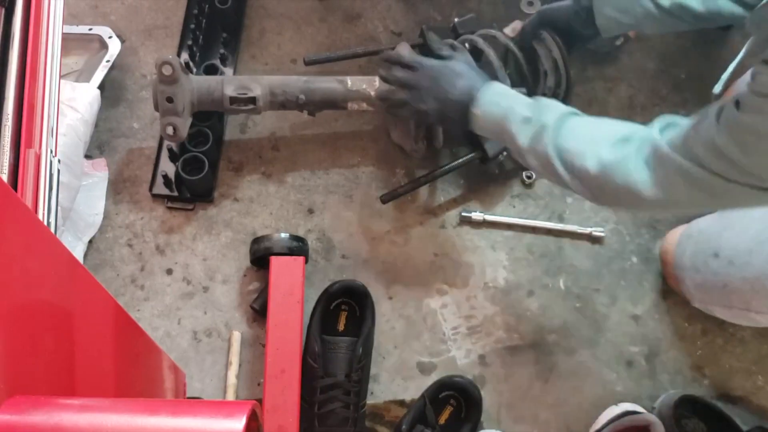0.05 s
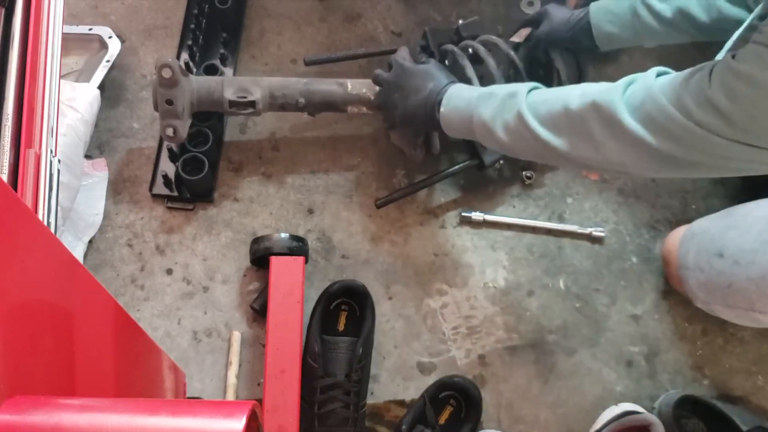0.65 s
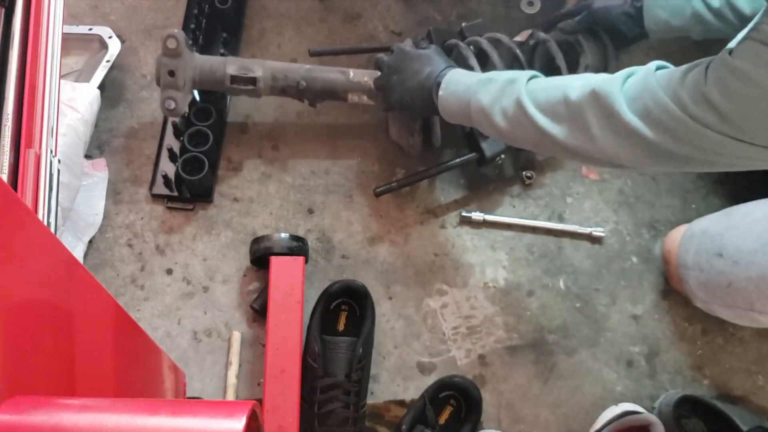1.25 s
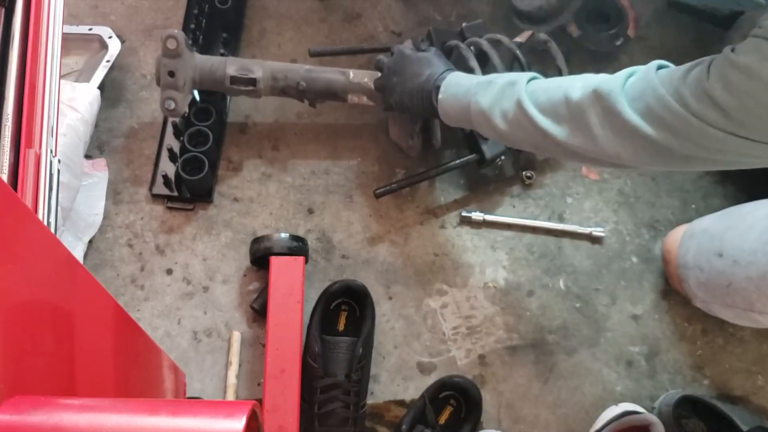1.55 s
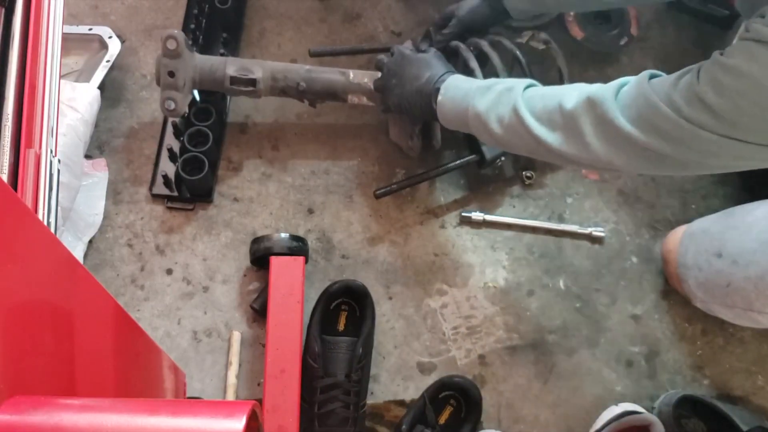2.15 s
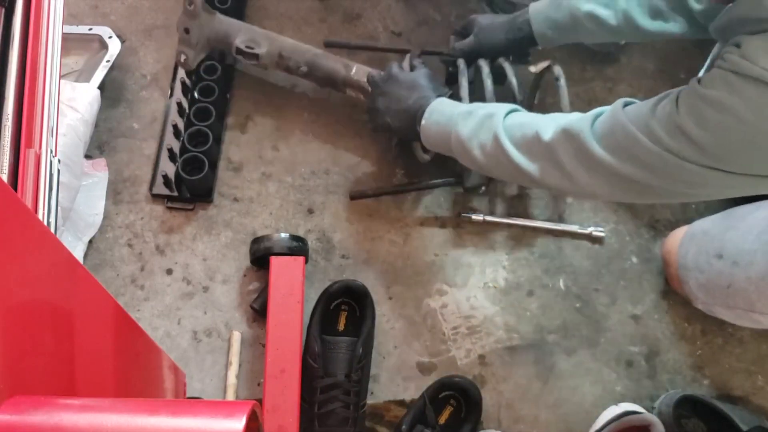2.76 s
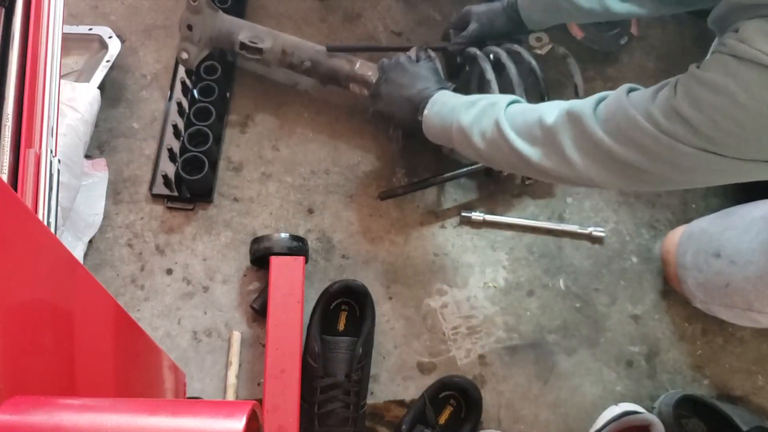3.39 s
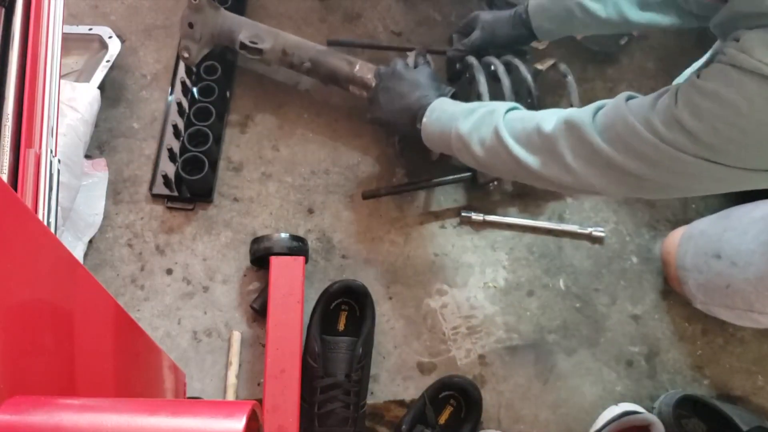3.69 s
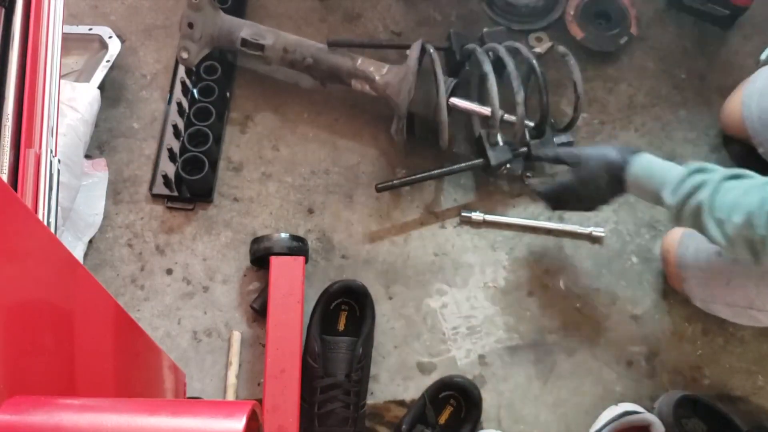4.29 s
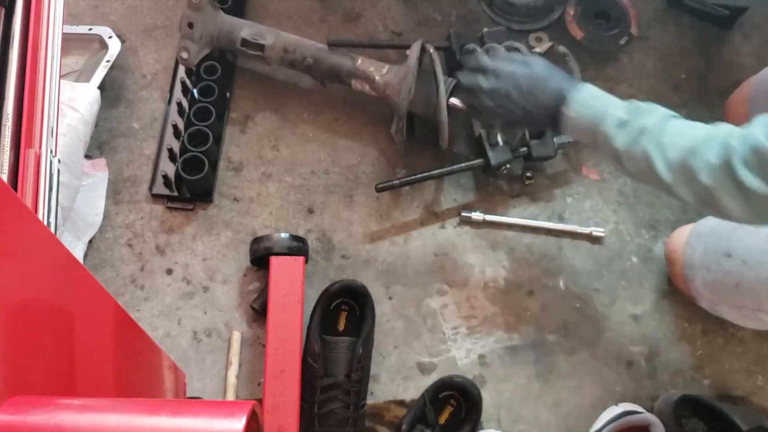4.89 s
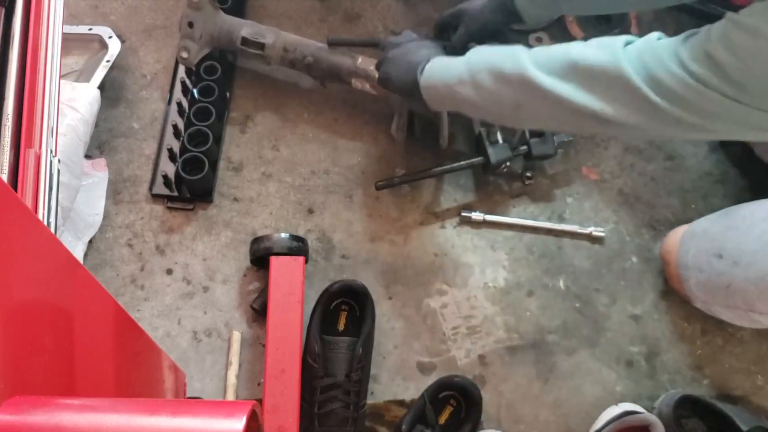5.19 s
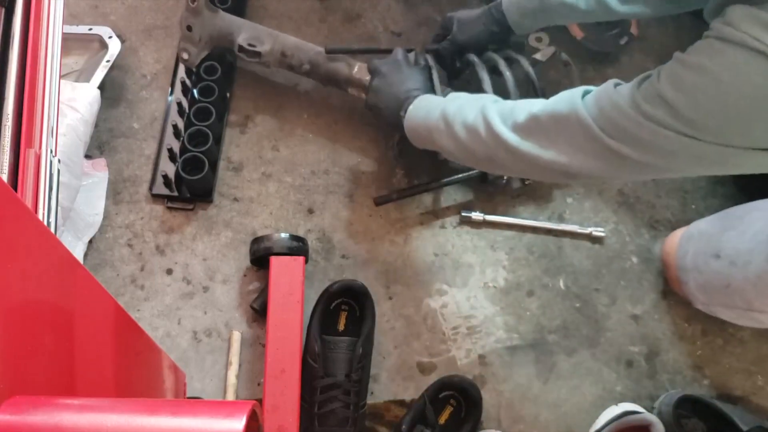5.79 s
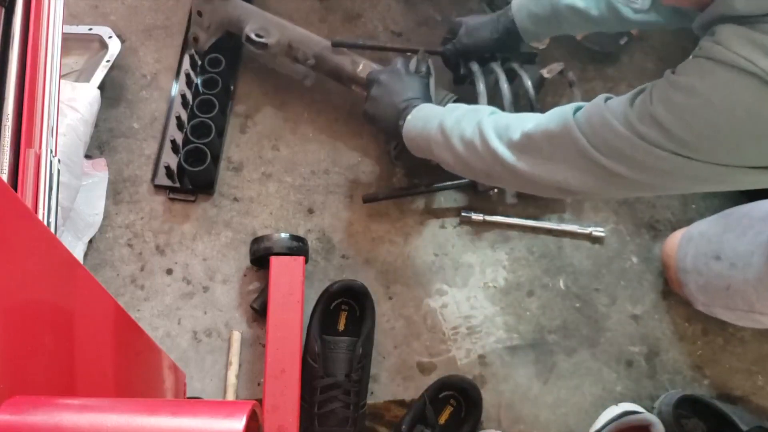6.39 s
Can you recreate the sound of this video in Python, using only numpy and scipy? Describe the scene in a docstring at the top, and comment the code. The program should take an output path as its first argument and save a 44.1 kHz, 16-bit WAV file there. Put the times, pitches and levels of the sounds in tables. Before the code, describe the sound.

A car strut is worked loose from its coil spring in a garage. A few light steel clinks build to a loud, quick clatter, then the spring rattles and rings faintly. More clanks and dull knocks follow and thin out. After a short lull come further clinks and knocks, a brief scrape and rustling sleeves. The sounds are close, with a short room echo over a low machine hum.

```python
"""Freeing a strut from its spring

A car strut is worked loose from its coil spring on a concrete garage floor. Impacts excite the modes
of the steel top mount, which clinks and clatters, and the heavy strut knocks on its supports. The coil
shudders against its seat, small hardware pings, and friction makes a short scrape and the rustle of
sleeves. The room reverberates, over a low machine hum and a distant rumble."""
import sys
import numpy as np
from scipy import signal
from scipy.fft import rfft, irfft
from scipy.io import wavfile
from scipy.ndimage import uniform_filter1d

SR = 44100
rng = np.random.default_rng(int(sys.argv[2]) if len(sys.argv) > 2 else 0)


def dump(signal):
    """Clip the signal to [-1, 1] and save it as 16-bit WAV at the path in sys.argv[1]."""
    limited = np.clip(np.atleast_2d(signal).T, -1, 1)
    pcm = np.round(limited * 32767).astype(np.int16)
    wavfile.write(sys.argv[1], SR, pcm)


N = 293265
TIME, RING_TIME = np.arange(N) / SR, np.arange(SR) / SR

# Levels are relative within each table; t60 is the time to decay by 60 dB.
# Steel on steel: start_s, level_db, thud_db, hardness_db, tick_db, mount_db, clatter_t60_s, favoured_hz
STEEL_STRIKES = [(0.413, 3, 0.5, 12.5, -12.5, -9.5, 0.13, 3050), (0.768, -1, 0, -2, -41, -30, 0.23, 2325),
                 (1.131, 8, 1, 3.5, -25, -6, 0.26, 1540), (1.183, 3, 6.5, 1, -37, -25, 0.055, 1480),
                 (1.688, 25, -9, -5, -22, -11.5, 0.13, 2880),
                 (1.76, 17, -7.5, -4.5, -21, -8.5, 0.057, 3690),
                 (1.793, 18.5, -12, -12.5, -26, -15.5, 0.049, 3690),
                 (1.875, 16.5, -5.5, 6.5, -3.5, -12, 0.079, 5400),
                 (1.927, 30.5, -17.5, -9.5, -20, -13.5, 0.04, 1200),
                 (1.935, 21.5, -17.5, 1.5, -8.5, -18, 0.031, 1297),
                 (2.044, 31, -25, -3.5, -20.5, -15.5, 0.063, 3130),
                 (2.082, 16.5, -25, -13, -23, -12.5, 0.075, 1050),
                 (2.769, 26.5, -8, -7, -16, -18.5, 0.084, 1049),
                 (2.971, 11.5, -8, -7.5, -31, -15, 0.043, 2454),
                 (3.108, 13.5, -8, 0.5, -22, -11, 0.16, 2454), (3.42, 1, -1, -6.5, -14, -22.5, 0.043, 1880),
                 (5.443, 1, -9.5, -6, -16, -20, 0.2, 1760), (5.713, 12, -8.5, -0.5, -29, -11, 0.19, 4280),
                 (6.222, -5.5, -26, 28.5, 0, -10.5, 0.02, 4120)]
# The strut shifting against its supports: start_s, level_db, thud_db, favoured_hz
STRUT_KNOCKS = [(0.844, -1.5, 15, 560), (0.911, 2, -13, 1945), (2.832, 17.5, -13, 1945),
                (3.268, 9, -3.5, 2454), (3.391, 4, -1.5, 1945), (3.801, -4.5, 6, 945),
                (3.858, -10.5, 17, 560), (4.036, -2, 3, 1200), (4.069, -2.5, -5, 1945), (5.77, 16, -6, 560),
                (5.897, 10, 3, 843), (6.034, -13, 9, 1540), (6.057, 8, -8, 560), (6.201, 3.5, 3, 560)]
# Treble roll-off of a knock: frequency_hz, gain_db
KNOCK_ROLLOFF = [(1900, -0.5), (2700, -10.5), (5500, -14.5), (12000, -34.5)]
# Modes of the top mount: pitch_hz, level_db, t60_s
MOUNT_MODES = [(288, -17, 0.064), (421, -9, 0.12), (555, -5.5, 0.17), (732, -5.5, 0.087),
               (845, -6.5, 0.093), (963, -5, 0.066), (1041.5, -4, .14), (1180, -7, 0.065),
               (1294, -10.5, 0.12), (1552, 1, 0.077), (1913, -9.5, 0.14), (2350, -6.5, 0.18),
               (2447, -4, 0.15), (2877, -2, 0.14), (3000, -4.5, 0.042), (3720, 0.5, 0.12),
               (4230, -8.5, 0.09), (4535, -11, .14), (5460, -2.5, 0.1), (6370, -3.5, .13), (6950, 1, 0.15),
               (6730, -2, 0.22)]
# The coil bouncing on its seat: start_s, level_db, hardness_db
COIL_BOUNCES = [(2.108, -19, -13.5), (2.197, -21, 2.5), (2.296, -24.5, -1.5), (2.366, -28, 2.5),
                (2.454, -24, -8.5), (2.513, -27.5, -4), (2.591, -26, -8), (2.654, -30, 2)]
# Short-lived modes of the coil: pitch_hz, level_db, t60_s
COIL_MODES = [(568.6, -5, 0.087), (621, -8, 0.071), (800.7, 1.5, 0.093), (845.5, 3.5, 0.079),
              (924, -2, 0.089), (1065, -9, 0.13), (1376, -31.5, 0.13), (1572, -13.5, 0.13),
              (1790, -13, .11), (2330, -20.5, 0.085), (2880, -26, 0.18)]
# Lightly damped modes of the coil: pitch_hz, level_db, t60_s
LINGERING_MODES = [(812, -42, 5), (847, -42, 5), (825, -47, 4.2), (940, -43, 2.2)]
# Spectrum of the coil's rattle: frequency_hz, gain_db
RATTLE_SPECTRUM = [(100, -19.5), (400, -6), (900, -2.5), (1900, -1.5), (3200, -11), (4500, -19),
                   (7000, -25.5), (15000, -50.5)]
# Pings of a nut or washer: start_s, level_db, finger_damping_db_per_s
NUT_PINGS = [(0.772, -30.5, 168), (2.275, -33.5, 16)]
# Its modes, of which the close pair beats: pitch_hz, level_db, t60_s
NUT_MODES = [(11550, -6, 0.9), (11548, -11, 0.99), (11720, -4, 0.29), (13250, -7, 0.25)]
# Spectrum of the scrape: frequency_hz, gain_db
SLIP_SPECTRUM = [(200, -30.5), (1000, -3.5), (1900, -4.5), (2600, 1), (3800, 5.5), (6500, -4), (7800, -29),
                 (11000, -27.5), (16000, -54)]
# Resonances of the scrape: pitch_hz, bandwidth_hz, level_db
SLIP_RESONANCES = [(2380, 30, -2), (3360, 24, -4), (3980, 50, -9), (4030, 28, -8), (6080, 33, -5),
                   (6380, 35, -4)]
# Strokes of sleeves and gloves: peak_s, level_db, swell_s, fade_s
CLOTH_STROKES = [(0.17, -42, 0.13, 0.12), (0.375, -39, 0.082, 0.05), (0.87, -44.5, 0.13, 0.14),
                 (1.39, -49, 0.13, 0.06), (2.75, -42, 0.19, 0.36), (3.359, -56.5, 0.57, 0.28),
                 (4.06, -44, 0.13, 0.08), (4.55, -56, 0.053, 0.28), (5.16, -42, 0.022, 0.24),
                 (5.452, -44, 0.038, 0.053), (5.52, -43, 0.018, 0.031), (5.93, -43.5, 0.042, 0.12),
                 (6.089, -42.5, 0.045, 0.081), (6.36, -29.5, 0.2, 0.14), (6.499, -32, 0.51, 0.059)]
# Spectrum of sliding cloth: frequency_hz, gain_db
CLOTH_SPECTRUM = [(100, -23), (300, -6), (600, 2), (1300, 6), (2500, 6.5), (4000, 10.5), (7000, 12.5),
                  (10000, -1.5), (13000, 1.5), (16000, -2.5)]
# Reverberation time of the garage: frequency_hz, t60_s
GARAGE_DECAY = [(150, 0.44), (400, 0.31), (1000, 0.31), (2800, 0.31), (7000, 0.29), (15000, 0.25)]
# Partials of the machine hum: pitch_hz, level_db
HUM_PARTIALS = [(70, -0.5), (104, -9.5), (140, -25)]
# Envelope of the hum: time_s, level_db
HUM_ENVELOPE = [(0, -50), (0.95, -49.5), (1.4, -55), (2.5, -62), (3.0, -51), (3.6, -56), (5.2, -45.5),
                (6.65, -45)]
# Spectrum of the distant rumble: frequency_hz, gain_db
RUMBLE_SPECTRUM = [(20, -24), (45, -1.5), (75, -2), (120, 2), (170, -3.5), (260, -15), (480, -11),
                   (750, -16), (1200, -21.5), (2200, -27.5), (5000, -57)]
# Envelope of the rumble: time_s, level_db
RUMBLE_ENVELOPE = [(0, -43), (1.0, -46.5), (1.8, -51), (3.5, -53), (4.6, -60.5), (5.7, -52.5), (6.65, -51)]
# Spectrum of still air: frequency_hz, gain_db
AIR_SPECTRUM = [(20, 27.5), (60, 23.5), (130, 20), (500, 18.5), (1200, 1), (2500, -4), (6000, 7),
                (10000, -5.5), (16000, -8.5)]
# Left-right likeness of diffuse sound: frequency_hz, correlation
COHERENCE = [(30, 0.89), (120, 1), (250, 0.67), (500, 0.89), (1000, 0), (3000, 0), (16000, 0)]
# Response of the microphone: frequency_hz, gain_db
MICROPHONE_RESPONSE = [(1000, -3), (7300, -10), (8100, -13.5), (9200, -12), (10500, -3.5), (14500, -3),
                       (16000, -15.5)]

TREMBLE_START_S, TREMBLE_END_S = 2.72, 3.8
CLANK_HZ, CLINK_HZ, TICK_HZ = 2400, 6120, 12100  # treble bands of an impact


def clinks(out_db=-3, pan_db=0.9):
    """Hard impact: the harder steel meets steel, the more treble the contact excites."""
    out = np.zeros((2, N))
    for start_s, db, thud_db, hard_db, tick_db, mount_db, t60_s, favoured_hz in STEEL_STRIKES:
        treble = [(CLANK_HZ, 0.77 * hard_db - 1), (CLINK_HZ, hard_db), (TICK_HZ, tick_db)]
        add(out, start_s, amp(db) * impact(thud_db, treble, mount_db, t60_s, favoured_hz))
    return out * amp([[out_db + pan_db], [out_db - pan_db]])


def knocks(out_db=-3, mount_db=-16, t60_s=0.085):
    """Dull impact: the heavy strut's longer contacts put little energy into the treble."""
    out = np.zeros((2, N))
    for start_s, db, thud_db, favoured_hz in STRUT_KNOCKS:
        knock = impact(thud_db, KNOCK_ROLLOFF, mount_db, t60_s, favoured_hz)
        add(out, start_s, amp(db + out_db) * knock)
    return out


def impact(thud_db, treble, mount_db, t60_s, favoured_hz):
    """Impulse excitation: a crack, a clatter and the mount's modes, some favoured by the strike point."""
    hz, mode_db, mode_t60_s = np.transpose(MOUNT_MODES)
    favoured_db = 9 * np.exp(-(np.log(hz / favoured_hz) / 0.12) ** 2)
    modes = np.transpose([hz, mode_db + favoured_db, mode_t60_s])
    sound = amp(mount_db - 28) * ring(modes, split=0.011)
    add(sound, 0, clatter(t60_s))
    add(sound, 0, amp(-6) * clatter(t60_s=0.0067))  # the crack
    rise_s = 0.00061 * amp(-0.6 * value_at(treble, CLINK_HZ))  # dull contacts build up more slowly
    sound *= 1 - np.exp(-RING_TIME / rise_s)
    bass = [(50, thud_db - 10), (150, thud_db), (520, thud_db / 2 + 1), (1000, 0)]
    return colour(sound, bass + treble)


def clatter(t60_s, size=8192):
    """Modal overlap: a crowd of short-lived modes merges into a noise burst, here of unit energy."""
    burst = diffuse(rng.standard_normal((2, size))) * amp(-60 * RING_TIME[:size] / t60_s)
    return burst / np.sqrt(np.sum(burst ** 2) / 2)


def coil(rise_s=0.0036, hand_damping_db_per_s=90):
    """Free vibration: taps ring and rattle the coil, and close modes beat until a hand damps them."""
    out = np.zeros((2, N))
    swell = 1 - np.exp(-RING_TIME / rise_s)
    for start_s, db, hard_db in coil_taps():
        tap = ring(COIL_MODES, split=0.014)
        rattle = colour(clatter(t60_s=0.2), RATTLE_SPECTRUM)
        add(tap, 0, amp(35 + hard_db) * rattle)
        add(out, start_s, amp(db) * tap * swell)
    add(out, COIL_BOUNCES[0][0], ring(LINGERING_MODES, count=1, size=N))
    return out * amp(-hand_damping_db_per_s * np.maximum(TIME - TREMBLE_END_S, 0))


def coil_taps(rebound_s=0.021, rebound_db=-7, gap_s=0.066, jitter_s=0.0095, fade_db_per_s=13):
    """Inelastic collision: each bounce rebounds once, more weakly; then a light tremble dies away."""
    rebounds = [(s + rebound_s, db + rebound_db, hard_db) for s, db, hard_db in COIL_BOUNCES]
    tremble = []
    for s in np.arange(TREMBLE_START_S, TREMBLE_END_S, gap_s):
        db = -32 - fade_db_per_s * (s - TREMBLE_START_S)
        tremble.append((rng.normal(s, jitter_s), db, -10))  # start_s, level_db, hardness_db
    return COIL_BOUNCES + rebounds + tremble


def pings():
    """Small bodies have high modes: a steel nut rings above 11 kHz, damped by the fingers."""
    out = np.zeros((2, N))
    for start_s, db, damping_db_per_s in NUT_PINGS:
        add(out, start_s, amp(db - damping_db_per_s * RING_TIME) * ring(NUT_MODES, count=1))
    return out


def slip(start_s=6.222, end_s=6.28, rise_s=0.018, release_db_per_s=1200, drive_db=-25.5, pan_db=2):
    """Stick-slip friction: the strut catches and lets go on its seat, driving narrow resonances."""
    release_db = release_db_per_s * np.clip(TIME - end_s, 0, 0.5)
    pressure = np.clip((TIME - start_s) / rise_s, 0, 1) * amp(drive_db - release_db)
    drive = crackle(SLIP_SPECTRUM, rate_per_s=2200) * pressure
    ringing = sum(amp(db + 7) * signal.lfilter(*signal.iirpeak(hz, hz / width_hz, SR), drive)
                  for hz, width_hz, db in SLIP_RESONANCES)
    return (drive + ringing) * amp([[pan_db], [-pan_db]])


def rustle(snap_db=-7, depth_db=17, out_db=-3, pan_db=1):
    """Friction noise: cloth and rubber hiss, with small fibre snaps, in strokes that swell and fade."""
    hiss = noise(CLOTH_SPECTRUM) + amp(snap_db) * crackle(CLOTH_SPECTRUM, rate_per_s=900)
    strokes_db = [db - depth_db * np.maximum((peak_s - TIME) / swell_s, (TIME - peak_s) / fade_s)
                  for peak_s, db, swell_s, fade_s in CLOTH_STROKES]
    return hiss * amp(np.max(strokes_db, axis=0)) * amp([[out_db + pan_db], [out_db - pan_db]])


def garage(sound, delay_s=0.0011, frame=256):
    """Reverberation: dense reflections from floor and walls, each band decaying at its own rate."""
    arrivals = rng.standard_normal((2, SR)) * (rng.random((2, SR)) < 0.15)
    reflections = diffuse(arrivals) * (RING_TIME > delay_s)
    hz, age_s, bands = signal.stft(reflections, SR, nperseg=frame)
    decay = amp(-60 * age_s / value_at(GARAGE_DECAY, hz)[:, None])
    tail = signal.istft(bands * decay, SR, nperseg=frame)[1]
    return signal.fftconvolve(sound, tail / np.linalg.norm(tail[0]), axes=1)[:, :N]


def background(waver_hz=0.99, hum_db=-1, air_db=-62, pan_db=1.1):
    """Frequency modulation: a machine's partials waver together, over distant rumble and still air."""
    drift = unit_rms(uniform_filter1d(uniform_filter1d(rng.standard_normal(N), 6000), 3000))
    clock_s = TIME + np.cumsum(waver_hz * drift) / SR / HUM_PARTIALS[0][0]
    partials = sum(amp(db) * np.sin(2 * np.pi * (hz * clock_s + rng.random())) for hz, db in HUM_PARTIALS)
    hum = amp(hum_db) * unit_rms(partials) * envelope(HUM_ENVELOPE)
    rumble = noise(RUMBLE_SPECTRUM) * envelope(RUMBLE_ENVELOPE)
    air = amp(air_db) * noise(AIR_SPECTRUM)
    return (hum + rumble + air) * amp([[pan_db], [-pan_db]])


def ring(modes, split=0, spread_rad=0.98, count=2, size=SR):
    """Modal superposition: damped sinusoids, single or in detuned pairs, phased apart left and right."""
    hz, db, t60_s = np.transpose(np.repeat(modes, count, axis=0))[:, :, None]
    hz = hz * (1 + split * rng.uniform(-1, 1, hz.shape))
    swing = amp(db - 60 * TIME[:size] / t60_s) * np.exp(2j * np.pi * hz * TIME[:size])
    phase = 2 * np.pi * rng.random(len(modes))
    phase = phase + spread_rad * np.outer([-0.5, 0.5], rng.choice([-1, 1], len(modes)))
    return (np.exp(1j * np.repeat(phase, count, axis=1)) @ swing).real / count


def crackle(spectrum, rate_per_s):
    """Shot noise: filtered random impulses of unit rms."""
    impulses = (rng.random(N) < rate_per_s / SR) * rng.standard_normal((2, N))
    return unit_rms(colour(impulses, spectrum))


def noise(spectrum):
    """Filtered Gaussian noise: steady, diffuse and of unit rms."""
    return unit_rms(colour(diffuse(rng.standard_normal((2, N))), spectrum))


def diffuse(pair):
    """Spatial coherence: long waves reach two close points alike, short waves independently."""
    left, other = rfft(pair)
    likeness = value_at(COHERENCE, np.fft.rfftfreq(pair.shape[1], 1 / SR))
    right = likeness * left + np.sqrt(1 - likeness ** 2) * other
    return irfft([left, right], pair.shape[1])


def colour(sound, spectrum, size=4096):
    """Minimum-phase filtering: the response is causal, so attacks stay sharp."""
    log_gain = np.log(amp(value_at(spectrum, abs(np.fft.fftfreq(size, 1 / SR)))))
    response = np.exp(np.conj(signal.hilbert(log_gain)))
    taps = np.fft.ifft(response).real[:size // 2]
    return signal.oaconvolve(sound, taps[None], axes=1)[:, :sound.shape[1]]


def value_at(curve, hz):
    """Interpolation on a log-frequency axis."""
    points_hz, values = np.transpose(curve)
    return np.interp(np.log(hz + 1), np.log(points_hz + 1), values)


def envelope(curve):
    """Interpolation in decibels gives a gain for every sample."""
    return amp(np.interp(TIME, *np.transpose(curve)))


def amp(db):
    """Amplitude ratio from decibels."""
    return 10 ** (np.asarray(db) / 20)


def unit_rms(sound):
    """Normalisation to an rms of one."""
    return sound / np.sqrt(np.mean(sound ** 2) + 1e-20)


def add(mix, start_s, sound):
    """Superposition: a sound joins the mix at start_s."""
    part = mix[..., round(start_s * SR):][..., :sound.shape[-1]]
    part += sound[..., :part.shape[-1]]


def scene(impact_room_db=-1, ring_room_db=-8, rub_room_db=-3):
    """Direct and reverberant fields add to the background."""
    impacts = clinks() + knocks()
    rings = coil() + pings()
    rubs = slip() + rustle()
    room = garage(amp(impact_room_db) * impacts + amp(ring_room_db) * rings + amp(rub_room_db) * rubs)
    return impacts + rings + rubs + room + background()


def record(dry, cutoff_hz=16300):
    """Transduction: the microphone notches the treble, softly saturates on peaks and limits the band."""
    saturated = np.tanh(colour(dry, MICROPHONE_RESPONSE))
    lowpass = signal.firwin(511, cutoff_hz, window=("kaiser", 9), fs=SR)
    return signal.oaconvolve(saturated, lowpass[None], "same", axes=1)


dry = scene()
out = record(dry)
dump(out)
```